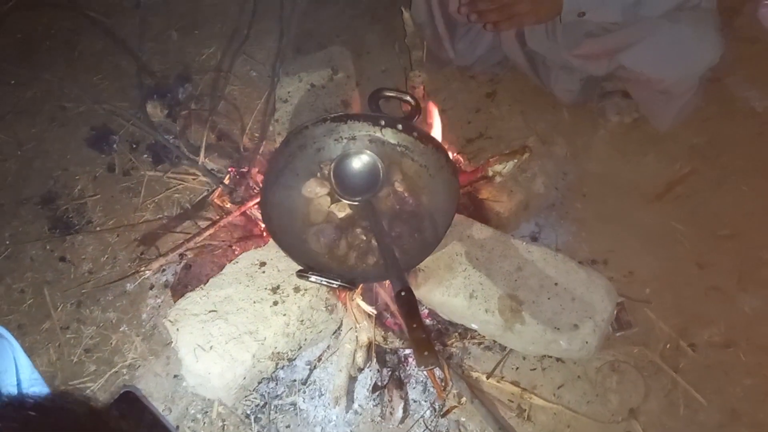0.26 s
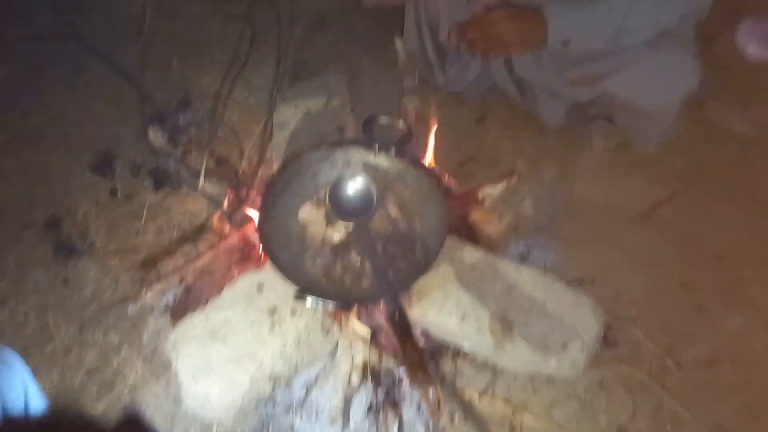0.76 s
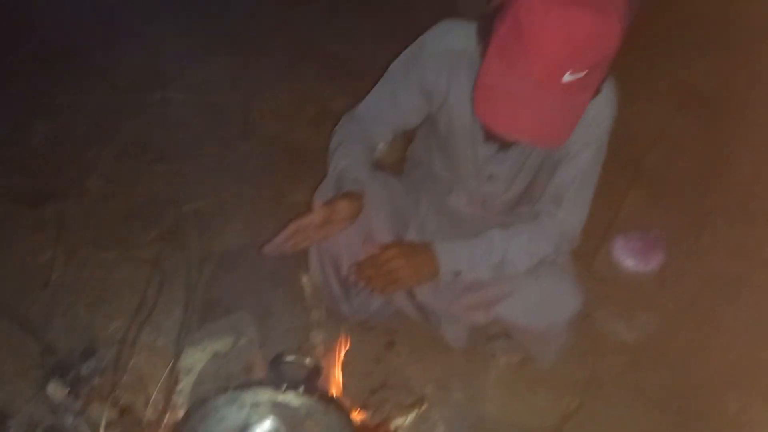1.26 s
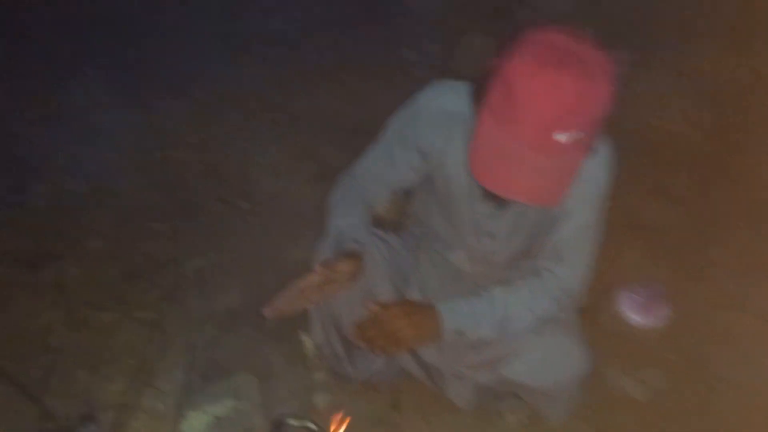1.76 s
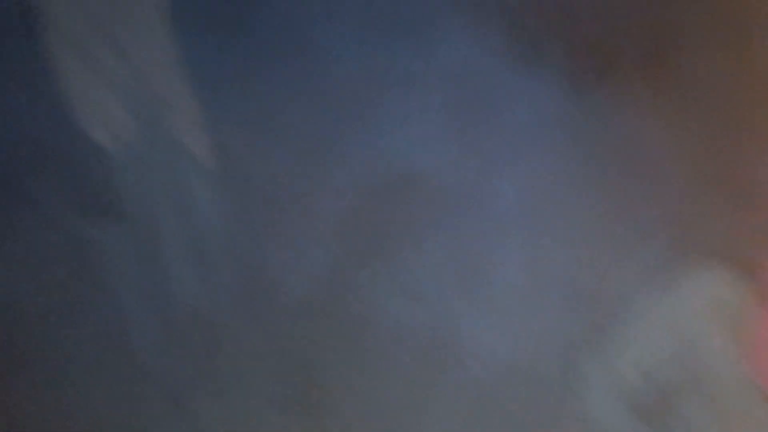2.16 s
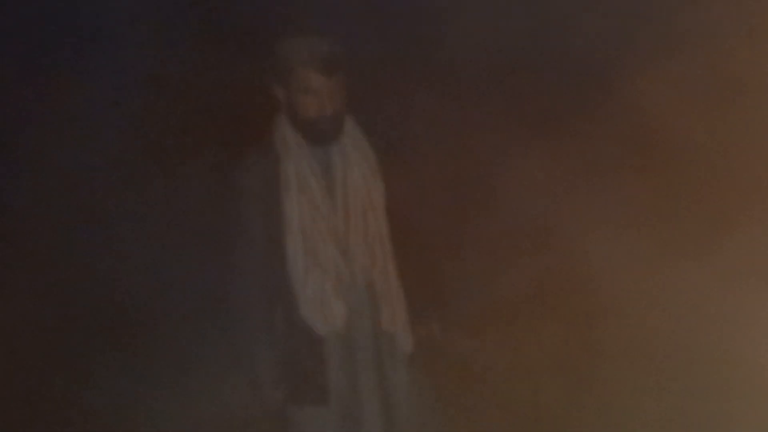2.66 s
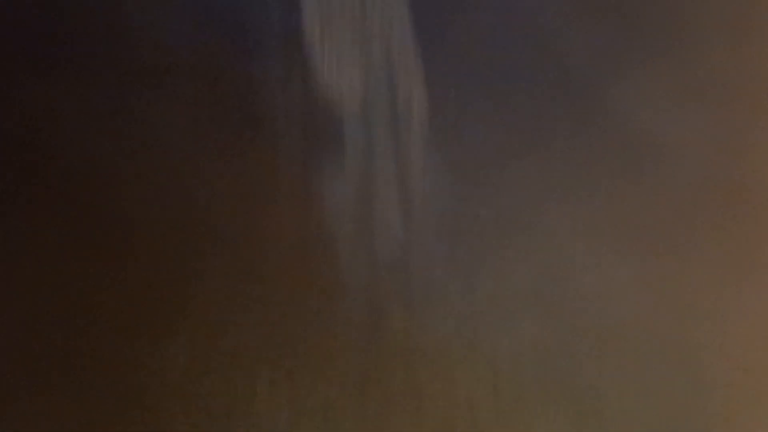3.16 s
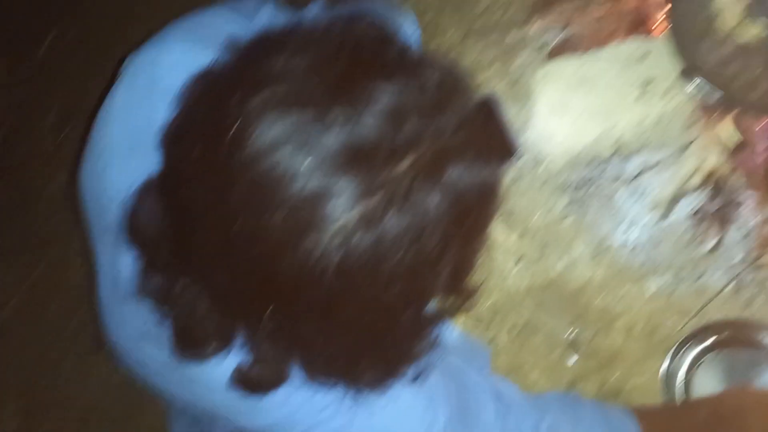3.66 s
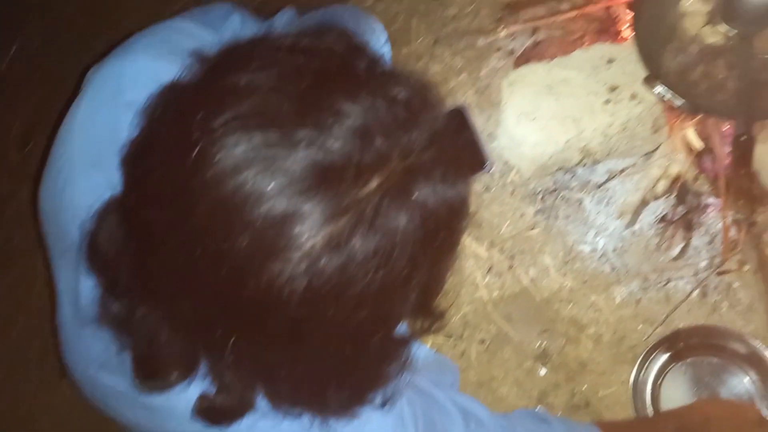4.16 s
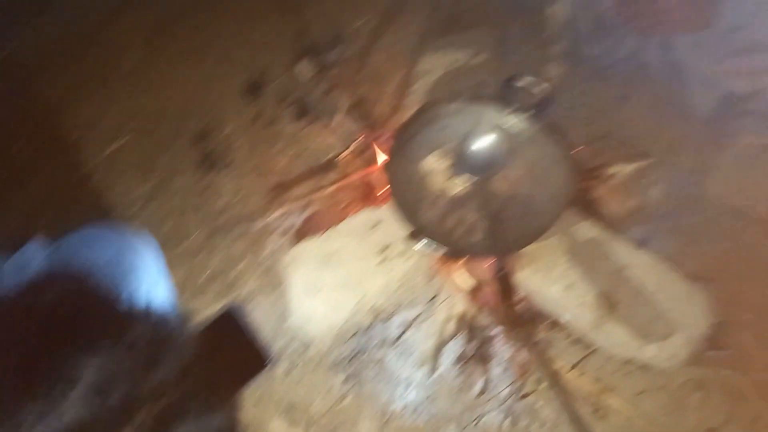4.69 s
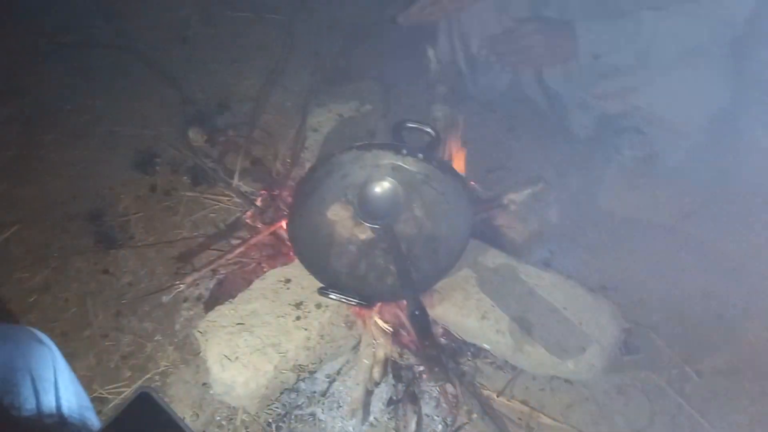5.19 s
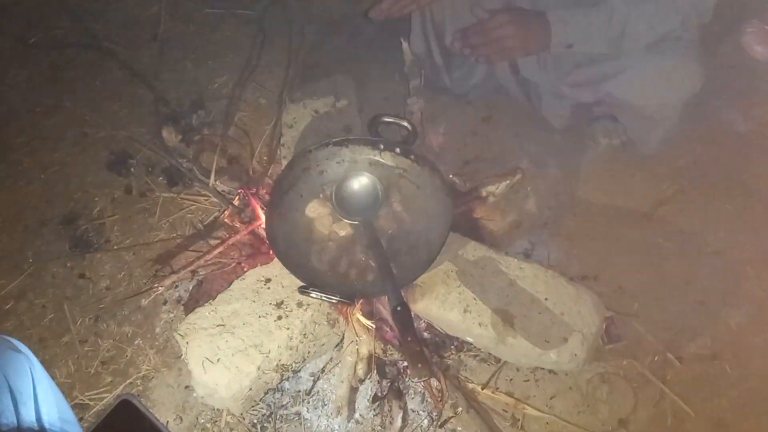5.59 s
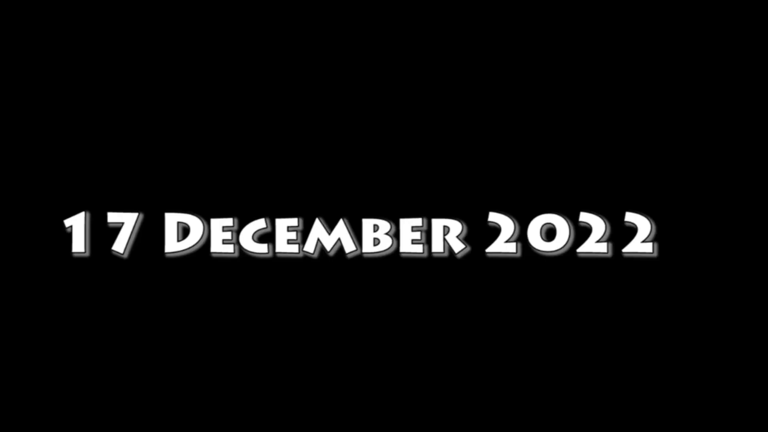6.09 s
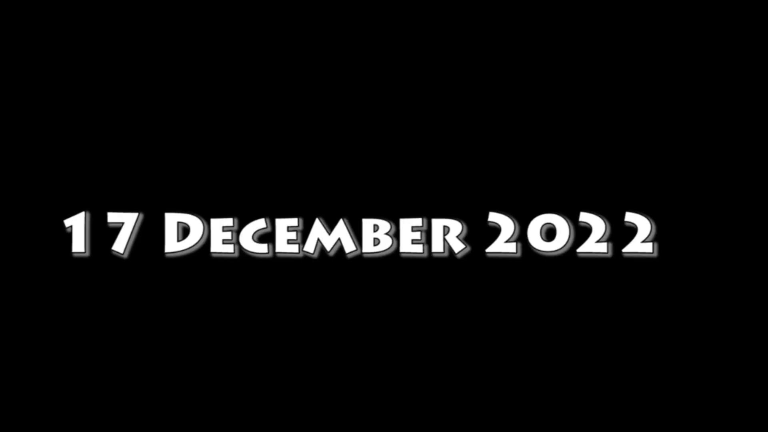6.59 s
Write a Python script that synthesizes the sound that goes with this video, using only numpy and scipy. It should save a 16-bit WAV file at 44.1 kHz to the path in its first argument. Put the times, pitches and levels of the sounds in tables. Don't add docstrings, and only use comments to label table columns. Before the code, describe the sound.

Steady, crackling sizzle of frying close by over a low fire rumble, with sharp spits and faint handling knocks, cutting dead near the end.

```python
import sys
import numpy as np
from scipy import signal
from scipy.fft import rfft, irfft
from scipy.io import wavfile

SR = 44100
rng = np.random.default_rng(int(sys.argv[2]) if len(sys.argv) > 2 else 0)


def linear_from_db(decibels):
    return 10 ** (np.asarray(decibels, float) / 20)


def master_out(mix):
    frames = np.transpose(np.atleast_2d(mix))
    ceiling = np.clip(frames, -1, 1)
    pcm = np.round(ceiling * 32767).astype(np.int16)
    wavfile.write(sys.argv[1], SR, pcm)


N = 301599
HZ = np.fft.rfftfreq(N, 1 / SR) + 1e-3
TIME = np.arange(N) / SR


def rms_one(x):
    return x / np.sqrt(np.mean(x ** 2, axis=-1, keepdims=True) + 1e-20)


def in_time(rows):
    start_s, *columns = np.transpose(rows)
    return np.array([np.interp(TIME, start_s, column) for column in columns])


def at_hz(points):
    hz, value = np.transpose(points)
    return np.interp(np.log(HZ), np.log(hz), value)


def shaped(x, gain):
    return irfft(rfft(x) * gain, N)


def drift(rate_hz):
    pole = np.exp(-80 * np.pi * rate_hz / SR)
    noise = rng.standard_normal(N // 40 + 2002)
    slow = signal.lfilter([1], [1, -2 * pole, pole ** 2], noise)[2000:]
    return np.interp(np.arange(N) / 40, np.arange(len(slow)), rms_one(slow - slow.mean()))


def ring(clicks, pitch_hz, t60_s):
    pole, turn = linear_from_db(-60 / (t60_s * SR)), 2 * np.pi * pitch_hz / SR
    return signal.lfilter([0, np.sin(turn)], [1, -2 * pole * np.cos(turn), pole ** 2], clicks + 1e-18)


def panned(x, pan_db):
    return x * linear_from_db(np.array([[.5], [-.5]]) * pan_db)


def struck(rows):
    out, click = np.zeros((2, N)), np.eye(1, 6000)[0]
    for start_s, peak_db, pitch_hz, t60_s, pan_db in rows:
        at = round(start_s * SR)
        tone = linear_from_db(peak_db) * ring(click, pitch_hz, max(t60_s, .001))
        out[:, at:at + len(click)] += panned(tone, pan_db)
    return out


# pitch_hz, level_db (per Hz)
NIGHT_SPECTRUM = [(15, -29.5), (35, -11), (62, -3.5), (110, -5), (150, -12), (220, -16), (310, -5),
                  (500, -14.5)]


def night():
    noise = rng.standard_normal((3, N))
    noise = noise[0] + 0.74 * noise[1:] * [[1], [1.3]]
    rumble = shaped(noise, linear_from_db(at_hz(NIGHT_SPECTRUM)) * (HZ < 500))
    return linear_from_db(-54.5 + 2.3 * drift(7.1)) * rms_one(rumble)


# start_s, pitch_hz, level_db
SLIP_CURVE = [(5.098, 272, -59), (5.11, 236, -31), (5.124, 225, -22), (5.131, 215, -45),
              (5.138, 205, -23.5), (5.15, 180, -41), (5.165, 169, -38.5), (5.195, 180, -42),
              (5.206, 185, -53)]


def slip():
    pitch_hz, level_db = in_time(SLIP_CURVE)
    phase = 2 * np.pi * np.cumsum(pitch_hz) / SR
    on = (TIME > SLIP_CURVE[0][0]) & (TIME < SLIP_CURVE[-1][0])
    return on * linear_from_db(level_db + 3) * (np.cos(phase) + .15 * np.cos(2 * phase))


# start_s, peak_db, pitch_hz, t60_s, pan_db
CASE_BUMPS = [(1.495, -44, 220, .03, -2), (2.108, -29.5, 251, .04, -15), (2.13, -37, 60, 0.09, -11),
              (2.482, -38, 220, 0.032, -9), (2.49, -40, 75, .06, -14), (3.41, -40.5, 89, 0.055, -11),
              (3.965, -44, 200, 0.029, -8), (3.98, -36.5, 62, 0.13, -17), (4.48, -40, 80, .07, -1),
              (6.002, -36.5, 170, 0.034, 1), (6.012, -43, 80, 0.065, 0)]


def bumps():
    return struck(CASE_BUMPS)


# pitch_hz, level_db (per Hz)
LEFT_COLOUR = [(260.0, -30), (700.0, -30.5), (1500.0, -19.5), (3500.0, -10), (6000.0, -25.0), (9000.0, -30),
               (13000.0, -19.5), (15680.0, -22)]
RIGHT_COLOUR = [(260.0, -31.5), (700.0, -30.5), (1500.0, -24.5), (3500.0, -14.4), (6000.0, -9),
                (9000.0, -27.5), (13000.0, -23.5), (15680.0, -24)]
# facing, pitch_hz, half_width_hz, gain_db
LEFT_SHADING = [(0, 2000.0, 100.0, 4), (0, 2280.0, 120.0, -6.5), (0, 2695, 490.0, -12),
                (0, 5200, 560.0, 6.0), (0, 7140, 510.0, 8.7), (0, 10370.0, 910.0, -6.5),
                (0, 12100, 3000.0, 4.5), (1, 850.0, 100.0, 5.1), (1, 2970, 580.0, -9.4),
                (1, 4440, 410.0, 4.6), (1, 7500, 880.0, 18.5), (1, 13330, 550.0, -5),
                (2, 520.0, 100.0, -1.5), (2, 3630, 470.0, -6.6), (2, 6920, 1280.0, 14),
                (3, 3070, 440.0, -11.5), (3, 4800.0, 470.0, 5.8), (3, 7670, 930.0, 18), (4, 734, 160.0, 4),
                (4, 1730, 130.0, -16.5), (4, 1800, 210.0, 11.9), (4, 2300, 350.0, -7.7),
                (4, 7340, 840.0, 12.5), (4, 11830.0, 2970.0, -4), (5, 877, 100.0, 2.5),
                (5, 2306, 150.0, -12), (5, 2960, 280.0, -9.7), (5, 5200, 450.0, 7.0), (5, 7190, 670.0, 13),
                (5, 13730, 880.0, 5.4)]
RIGHT_SHADING = [(0, 820.0, 310.0, -1.5), (0, 860.0, 100.0, 5.5), (0, 4930.0, 590.0, 5.5),
                 (0, 7640, 1440.0, -14.5), (0, 9000, 560.0, 10.5), (1, 850.0, 100.0, 5.6),
                 (1, 2270, 260.0, 5.5), (1, 3660, 280.0, -3.3), (1, 6960, 850.0, -13.5),
                 (2, 1410, 150.0, -1.5), (2, 2000, 180.0, 10), (2, 3040, 210.0, 3.5), (2, 7330, 760.0, -9),
                 (2, 13700, 990.0, -4), (3, 1860.0, 150.0, 3.0), (3, 2900.0, 160.0, -4),
                 (3, 4490.0, 240.0, -4.4), (3, 7000, 1200.0, -6.5), (3, 14180.0, 680.0, -2.8),
                 (4, 490.0, 100.0, 4), (4, 920.0, 100.0, 3.5), (4, 2920.0, 180.0, -5),
                 (4, 3720, 430.0, 4.8), (4, 7260, 880.0, -14.5), (4, 10330, 920.0, -5.5),
                 (5, 855, 100.0, 3.5), (5, 2880, 110.0, -6.7), (5, 3960, 540.0, 7), (5, 7410, 780.0, -11.0),
                 (5, 14720.0, 550.0, 4.0)]


def ports(facing=None):
    gains_db = []
    for colour, shading in ((LEFT_COLOUR, LEFT_SHADING), (RIGHT_COLOUR, RIGHT_SHADING)):
        gain_db = at_hz(colour)
        for index, pitch_hz, half_width_hz, shade_db in shading:
            if round(index) == facing:
                gain_db = gain_db + shade_db * np.exp(-.5 * ((HZ - pitch_hz) / half_width_hz) ** 2)
        gains_db.append(gain_db)
    return linear_from_db(gains_db)


# pitch_hz, width_hz, level_db
TWIG_MODES = [(466, 30, -29), (686, 40, -18.5), (975, 24, -19.5), (1920, 23, -4.5), (2340, 18, 6.5),
              (2980, 40, -26), (4370, 170, -12.5), (5730, 38, 5.5), (6350, 60, 2), (7100, 71, 5.5)]


def twig():
    since_s = TIME - 1.408
    rise = (since_s > 0) * np.minimum(since_s / .0025, 1)
    tearing = rise * linear_from_db(-60 * np.abs(since_s) / 0.1) * rng.standard_normal((3, N))
    tearing = tearing[0] + 0.68 * tearing[1:]
    modes = 0
    for pitch_hz, width_hz, level_db in TWIG_MODES:
        modes = modes + linear_from_db(.5 * level_db) * ring(tearing, pitch_hz, 2.2 / (width_hz + 100))
    crack = shaped(tearing, ports())
    both = modes / abs(modes).max() + 0.66 * crack / abs(crack).max()
    return linear_from_db(-3) * signal.sosfilt(signal.butter(4, 480, "high", fs=SR, output="sos"), both)


# start_s, peak_db, pan_db
SPIT_EVENTS = [
    (0.622, -15.5, 6.5),
    (2.0537, -7.5, -0.5),
    (2.9306, -13, 2),
    (4.7713, -5, 0),
    (4.896, -23.5, 0.5),
    (5.1327, -3.5, 0.5),
    (5.2324, -14.5, 4),
    (5.6092, -12, 6),
]


def spits():
    out, puff = np.zeros((2, N)), np.hanning(60)
    for start_s, peak_db, pan_db in SPIT_EVENTS:
        at = round(start_s * SR)
        noise = rms_one(rng.standard_normal((2, len(puff))))
        out[:, at:at + len(puff)] += panned(linear_from_db(peak_db - 0.5) * puff * noise, pan_db)
    return shaped(out, (HZ / 13000) ** 2 * (HZ > 6000))


# start_s, peak_db, pitch_hz, t60_s, pan_db
POP_EVENTS = [(.067, -23, 900, .012, 2), (.942, -14, 2820, 0.011, -3), (1.761, -15, 2930, .012, -3),
              (1.899, -12.5, 4080, .015, 1), (2.22, -17, 850, .01, -3), (2.221, -30, 3518, .004, -3),
              (2.724, -17, 2090, .01, 0), (3.127, -12.5, 2230, 0.014, 1), (3.304, -15, 2330, 0.012, 0),
              (3.4, -20, 1980, 0.015, 5), (3.609, -18.5, 1790, 0.047, 4), (4.487, -17.5, 1200, .012, 1),
              (5.247, -22, 1150, 0.026, 0), (5.374, -20.5, 1750, 0.031, 3), (5.653, -18, 4002, .006, -4),
              (5.666, -10, 3890, .006, -4)]


def pops():
    return shaped(struck(POP_EVENTS), HZ ** 2 / (HZ ** 2 + 400.0 ** 2))


def bubbles(per_s, spread_db, cycles, surge_db, count=14):
    surge = linear_from_db(surge_db * (.9 * drift(4) + 1.5 * drift(13) + .8 * drift(60)))
    burst = rng.random(N) < per_s * surge / SR
    sizes = linear_from_db(spread_db * np.minimum(rng.exponential(1, N), 4)) * burst
    train = sizes * rng.choice([-1, 1], (2, N))
    dealt = rng.integers(0, count, N)
    out, power, click = 0, 0, np.eye(1, N)[0]
    for k, pitch_hz in enumerate(np.geomspace(450, 16000, count)):
        t60_s = cycles / pitch_hz
        out = out + ring(train * (dealt == k), pitch_hz, t60_s)
        power = power + abs(rfft(ring(click, pitch_hz, t60_s))) ** 2
    return rms_one(shaped(out, 1 / np.sqrt(power + 1e-9)))


# facing, left_lag_ms, share, fade_hz
PORT_PATHS = [(0, -0.053, 1.18, 1850.0), (0, 0.29, -0.18, 5730.0), (0, -0.55, -0.2, 19160.0),
              (0, -0.9, -0.22, 7830.0), (0, -0.188, -0.25, 13640.0), (1, -0.17, 0.48, 4610.0),
              (1, -0.616, -0.32, 9700), (1, -0.22, 0.62, 920.0), (1, -1.5, -0.14, 5220.0),
              (1, -1.225, 0.061, 8990.0), (2, 0.226, 0.6, 2080.0), (2, -0.607, -0.51, 4660.0),
              (2, 0.65, -0.16, 9940.0), (2, 0.353, -0.45, 5240.0), (2, -1.117, -0.22, 5160.0),
              (3, 0.11, 1.94, 970.0), (3, -0.881, 0.55, 3390.0), (3, -0.448, 0.31, 4950.0),
              (3, 0.425, -0.25, 10240.0), (3, -1.5, 0.48, 1100.0), (4, 0.17, 0.66, 3090.0),
              (4, 0.687, -0.21, 7370.0), (4, 0.82, 0.17, 6150.0), (4, -0.042, 0.4, 6280.0),
              (4, 0.46, 0.11, 20000.0), (5, -0.042, 0.73, 4280.0), (5, -0.31, 0.37, 7830.0),
              (5, 0.11, 0.12, 20000.0), (5, 0.46, -0.11, 20000.0), (5, -0.393, -0.27, 2080.0)]


def likeness(facing):
    alike = 0
    for index, left_lag_ms, share, fade_hz in PORT_PATHS:
        if round(index) == facing:
            lag = -2j * np.pi * HZ * left_lag_ms / 1000
            alike = alike + 1.15 * share * np.exp(lag - (HZ / fade_hz) ** 2)
    return alike / np.maximum(abs(alike), 1)


# start_s, facing (index into ECHO_SHARES), pan_db
TURNING = [(0, 0, 0.23), (.5, 0, 0), (.86, 0, -.5), (1.12, 0.82, -2.2), (1.4, 1, 0), (1.75, 1, -.5),
           (2.0, 1, 1), (2.2, 1.2, 1), (2.38, 2, 0), (2.8, 2, -0.3), (3.17, 2, -0.17), (3.3, 3, -0.079),
           (3.47, 3.5, 0), (3.62, 4, 0), (4.4, 4, -0.038), (4.7, 4.5, 1), (5.05, 5, 0.098), (6.2, 5, 0)]
ECHO_SHARES = [
    0.62,
    .6,
    .2,
    0.22,
    0.62,
    0.57,
]
# start_s, level_db
FAT_VIGOUR = [(0, 0), (.35, 0.5), (.7, 0), (1.0, 1), (1.25, 1), (1.6, 0.5), (1.95, 0), (2.3, 0.5),
              (2.65, 0), (3.0, 1), (3.35, 0.5), (3.75, 0), (4.1, 0), (4.45, 0.5), (4.8, 0.5), (5.15, 1),
              (5.6, 0), (6.2, 0)]


def frying():
    fat = bubbles(per_s=9000, spread_db=2.5, cycles=7.0, surge_db=1.71)
    fat = fat + linear_from_db(-1.5) * rng.standard_normal((2, N))
    shared, other = rfft(rms_one(fat)) * (HZ / 300) ** 2 / (1 + (HZ / 300) ** 2)
    echo_ms, echo_cut_hz = 1.742, 2100
    bounce = np.exp(-2j * np.pi * HZ * echo_ms / 1000) / (1 + (HZ / echo_cut_hz) ** 4)
    (facing, pan_db), (vigour_db,) = in_time(TURNING), in_time(FAT_VIGOUR)
    out = np.zeros((2, N))
    for k, echo in enumerate(ECHO_SHARES):
        alike = likeness(k)
        left = alike * shared + np.sqrt(1.0001 - abs(alike) ** 2) * other
        heard = irfft([left, shared] * ports(k) * (1 + echo * bounce), N)
        out += np.clip(1 - abs(facing - k), 0, 1) * heard
    treble = shaped(out, 1 / (1 + (8800 / HZ) ** 12))
    low = shaped(out, 1 / (1 + (HZ / 3000) ** 8))
    middle = panned(linear_from_db(vigour_db) * (out - low - treble), pan_db)
    low_db = 0.27 + .6 * vigour_db
    treble_db = 0.02 + 1.3 * vigour_db + 0.87 * drift(16)
    return linear_from_db(low_db) * low + middle + linear_from_db(treble_db) * treble


def scene():
    return night() + slip() + bumps() + twig() + spits() + pops() + frying()


def low_pass(x):
    return signal.sosfilt(signal.butter(12, 17030, fs=SR, output="sos"), x)


def record(dry):
    stop_s, fade_s = 6.165, 0.0037
    x = signal.sosfilt(signal.butter(2, 50, "high", fs=SR, output="sos"), dry)
    x = 1.2 * np.tanh(x / 1.2) * np.clip((stop_s - TIME) / fade_s, 0, 1) ** 1.5
    x = signal.sosfilt(signal.ellip(12, .5, 75, 15720, fs=SR, output="sos"), x)
    return low_pass(x * (TIME < stop_s + .01))


dry = scene()
out = record(dry)
master_out(out)
```